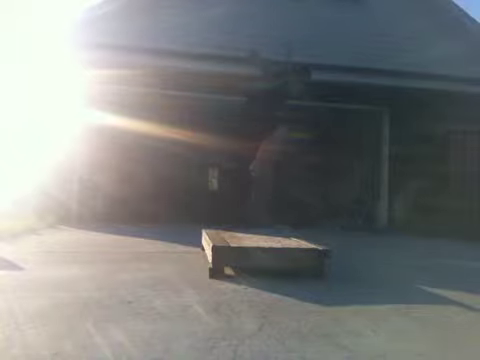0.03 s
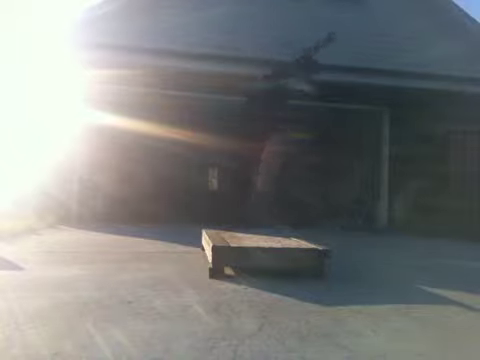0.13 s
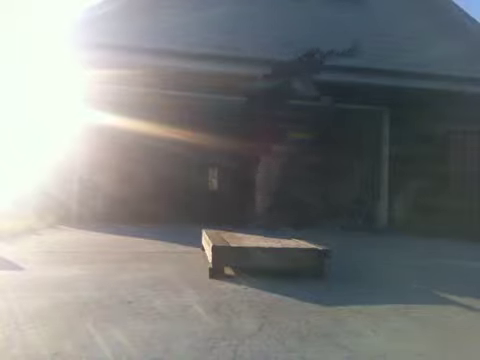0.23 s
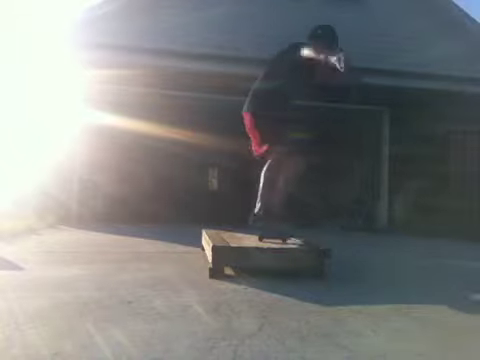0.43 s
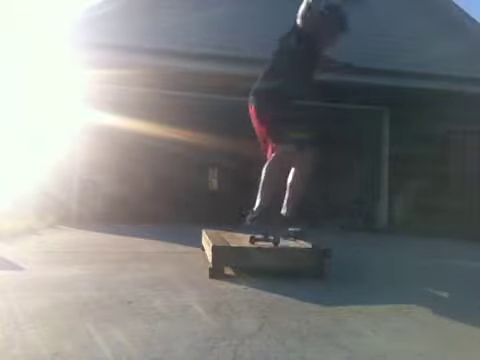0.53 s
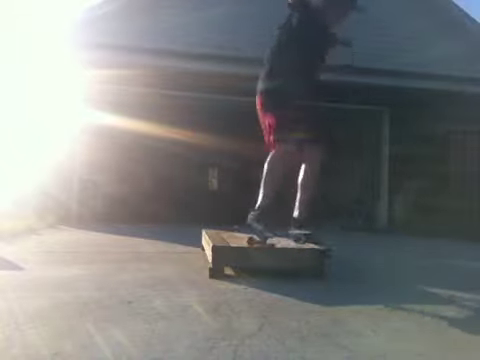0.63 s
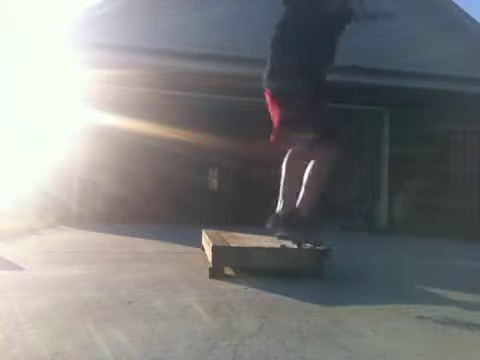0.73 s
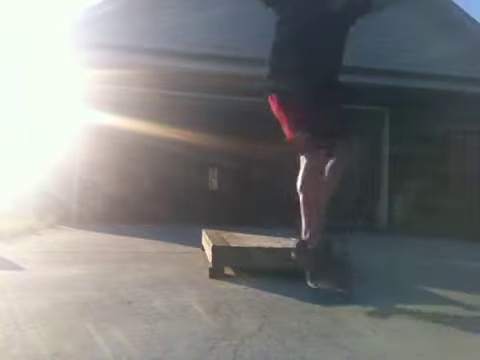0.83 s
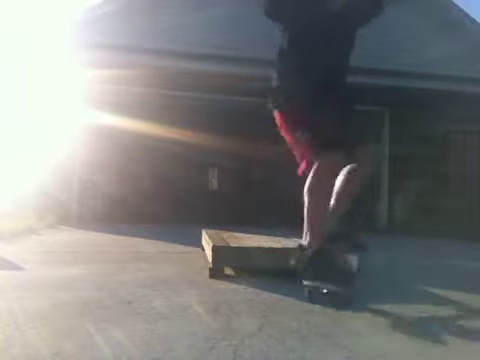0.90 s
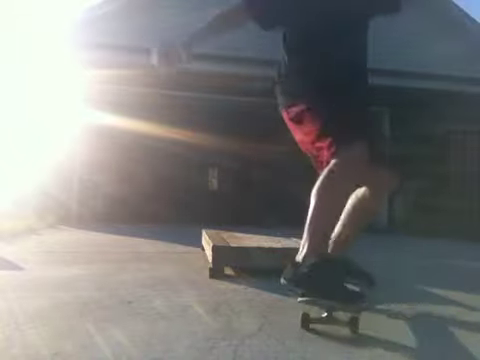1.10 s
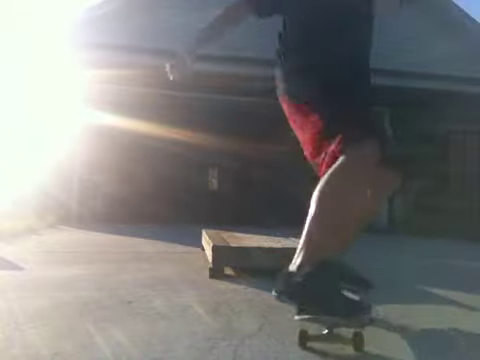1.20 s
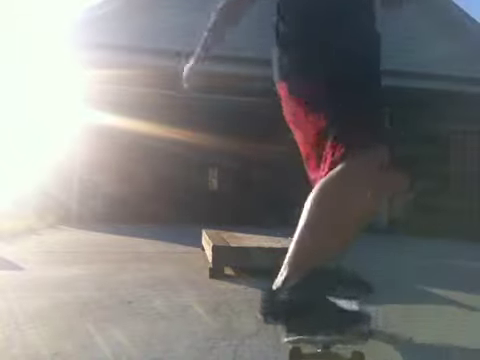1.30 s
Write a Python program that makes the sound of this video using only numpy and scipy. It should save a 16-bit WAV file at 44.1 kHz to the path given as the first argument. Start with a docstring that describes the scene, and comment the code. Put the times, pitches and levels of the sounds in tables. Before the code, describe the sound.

Skateboard knocks hard onto a low wooden box, rolls briefly, then clacks down onto concrete outdoors

```python
"""On concrete by a garage front, a skateboard pops, lands on a low wooden box, rolls over it, drops and rolls on.
Each contact pushes the deck: its low bending modes thud and its upper modes knock, all as dying sines.
The metal trucks clack with modes of their own, and grit crunches as bursts of shaped noise.
Rolling shakes the deck modes with noise. The garage front answers the contacts briefly;
a small camera thins the bass and adds its hiss."""
import sys
import numpy as np
from scipy import signal
from scipy.fft import rfft, irfft, next_fast_len
from scipy.io import wavfile
from scipy.ndimage import map_coordinates

SR = 44100
rng = np.random.default_rng(int(sys.argv[2]) if len(sys.argv) > 2 else 0)


def log_audio(samples):
    """Write samples as a 16-bit WAV file to the path given in sys.argv[1]."""
    # one column per channel
    frames = np.atleast_2d(samples).T
    # limit to full scale, then quantise
    limited = np.clip(frames, -1, 1)
    pcm = np.round(limited * 32767).astype(np.int16)
    wavfile.write(sys.argv[1], SR, pcm)


def volts_from_db(level):
    """Convert decibel levels to linear amplitude ratios."""
    exponent = np.asarray(level, float) / 20
    return 10 ** exponent


N = 59535  # length in samples, 1.35 s

# Bending modes of the deck. Each row: frequency in Hz, relative level in dB, decay time t60 in seconds.
DECK_MODES = [(100, 3.5, 0.084), (150, 14, 0.061), (177.3, 10.5, 0.12), (220, 3, 0.15), (269.7, 5, 0.076),
              (310, -1, 0.14), (387.6, -1.5, 0.073), (485.5, 1, 0.057), (560, -14, 0.042),
              (684.6, -7.5, 0.038), (741.6, -8, 0.054), (854, -10.5, 0.064), (962, -10, 0.045),
              (1076, -10, 0.027), (1193, -11, 0.068), (1513, -1.5, 0.033)]
# Contacts of tail and wheels. Each row: start in seconds, thud drive in dB, centre of the favoured thud modes
# in Hz, knock drive in dB, centre of the favoured knock modes in Hz.
DECK_BLOWS = [(.006, -56, 272, -45, 936), (.012, -51, 310, -43.5, 500), (0.029, -60, 282, -74, 636),
              (0.071, -51.5, 310, -70, 483), (.205, -66.5, 158, -62, 376), (0.242, -38, 237, -36.5, 746),
              (.248, -66, 190, -34.5, 800), (.253, -32.5, 205, -29, 515), (.265, -52, 246, -37.5, 500),
              (.285, -41, 150, -46.5, 730), (0.294, -39.5, 300, -58, 590), (.330, -47.5, 196, -49, 500),
              (.348, -58, 247, -39, 520), (.355, -53.5, 204, -43.5, 1150), (0.368, -38.5, 310, -45.5, 500),
              (.891, -35, 308, -36.5, 725), (.897, -36.5, 280, -36, 677), (0.913, -40.5, 241, -32.5, 640),
              (0.925, -32, 348, -54.5, 500), (.933, -40.5, 220, -55.5, 1306), (0.945, -46, 295, -48.5, 695),
              (0.956, -52, 220, -64, 500), (.976, -43.5, 225, -51, 500), (1.002, -61, 300, -34, 523),
              (1.011, -45.5, 306, -35, 966), (1.014, -29.5, 269, -27, 560), (1.027, -64, 290, -43, 500),
              (1.037, -42.5, 247, -73, 660), (1.056, -49, 167, -56, 520)]
# Ringing modes of the metal trucks. Each row: frequency in Hz, relative level in dB, decay time t60 in seconds.
TRUCK_MODES = [(1800, -10, 0.023), (2170, 0.5, 0.033), (2727, -2.5, 0.025), (3066, 2, 0.013),
               (3400, -4, 0.026), (4600, -4.5, 0.011)]
# Clacks of the trucks. Each row: start in seconds, drive in dB, centre of the favoured modes in Hz.
TRUCK_CLACKS = [(.006, -56.5, 2790), (.242, -56.5, 3200), (.249, -55.5, 2200), (.348, -47, 2820),
                (.349, -56, 4600), (.353, -76, 2100), (.895, -56.5, 2700), (.926, -56.5, 2970),
                (1.011, -57, 3270), (1.014, -46, 3400)]
# Grit crushed under wheels and tail. Each row: start in seconds, drive in dB, decay time t60 in seconds.
GRIT_SCUFFS = [(.006, -58, 0.072), (0.243, -47.5, 0.073), (0.251, -55, 0.19), (0.349, -50.5, 0.07),
               (0.844, -67, 0.36), (0.89, -54, 0.18), (0.926, -52.5, .12), (1.002, -47.5, 0.073),
               (1.01, -41.5, 0.034), (1.036, -72, 0.42)]
# Colour of the crushed grit. Each row: frequency in Hz, relative level in dB.
GRIT_COLOUR = [(600, -5), (1000, 5.5), (1500, 4.5), (2400, -8.5), (3400, -10.5), (5500, -27.5), (8000, -41)]
# Course of the rolling wheels. Each row: time in seconds, thud drive in dB, centre of the favoured thud modes
# in Hz, knock drive in dB.
ROLL_COURSE = [(0, -55.5, 271, -54), (0.099, -75, 220, -70), (.235, -83.5, 184, -79),
               (.3, -52.5, 191, -49.5), (.4, -58.5, 220, -52.5), (.47, -58, 203, -57.5),
               (.54, -55.5, 226, -59), (.62, -49, 240, -57), (.7, -57.5, 213, -57.5),
               (.77, -65.5, 217, -62.5), (.885, -59, 233, -64), (.95, -43, 240, -56), (1.0, -52, 220, -50),
               (1.08, -57.5, 220, -52), (1.12, -56.5, 220, -54), (1.14, -64.5, 199, -63),
               (1.16, -55, 180, -58.5), (1.199, -55, 175, -57), (1.29, -51, 183, -63),
               (1.35, -54.5, 190, -70)]
# Decay of the garage front's answer. Each row: frequency in Hz, decay time t60 in seconds.
GARAGE_DECAY = [(150, 0.26), (700, 0.15), (3000, 0.32)]
# Colour of the camera's hiss. Each row: frequency in Hz, relative level in dB.
HISS_COLOUR = [(24, 2), (60, -1.5), (150, 6.5), (600, 3.5), (900, 5.5), (1600, 1), (3000, -0.5), (4500, -3),
               (6500, -5.5), (8500, -10.5), (11000, -15.5), (15500, -19)]

RING_S = np.arange(SR // 4) / SR  # time within one ring or scuff, in seconds
MODE_SCATTER_DB = 1.5  # each contact hits another spot
THUD_OCTAVES, KNOCK_OCTAVES, CLACK_OCTAVES = 0.34, 0.35, 0.27  # spread of the favoured modes
THUD_RISE_S, KNOCK_RISE_S, CLACK_RISE_S, SCUFF_RISE_S = 0.0014, 0.0003, 0.00047, 0.0014
BUMP_DB, BUMPS_PER_S = 0.88, 51  # unevenness of the ground
ROLL_KNOCK_HZ, ROLL_KNOCK_OCTAVES, ROLL_LOW_HZ = 500, 0.36, 109
GARAGE_DB, GARAGE_DELAY_S = -13, 0.011
MIC_LOW_HZ, HISS_DB = 131.7, -70.5


def along(points, hz):
    """Reads a curve of (Hz, value) points on a log frequency axis."""
    point_hz, value = np.transpose(points)
    return np.interp(np.log(hz + 1), np.log(point_hz + 1), value)


def unit(x):
    """Scales a sound to rms 1."""
    return x / np.sqrt(np.mean(x ** 2) + 1e-20)


def filtered(x, response):
    """Multiplies the spectrum of x by a response of frequency."""
    size = next_fast_len(N + SR // 2)
    spectrum = rfft(x, size) * response(np.fft.rfftfreq(size, 1 / SR))
    return irfft(spectrum, size)[..., :N]


def coloured_noise(colour):
    """White noise shaped by a colour curve, at rms 1."""
    return unit(filtered(rng.standard_normal(N), lambda hz: volts_from_db(along(colour, hz))))


def favoured(centre_hz, octaves, modes):
    """A push favours modes near its centre: a bell-shaped weight over octaves."""
    mode_hz = [mode[0] for mode in modes]
    distance = np.log2(np.divide.outer(mode_hz, centre_hz))
    return np.exp(-0.5 * (distance / octaves) ** 2)


def ring(modes, gains, rise_s, pair_factor=1):
    """A struck body sums dying sines; each further pair of modes is multiplied by pair_factor once more."""
    total = np.zeros(len(RING_S))
    for k, ((hz, db, t60), gain) in enumerate(zip(modes, gains)):
        level = pair_factor ** ((k + 1) // 2) * gain  # a negative factor also flips every other pair
        total += level * volts_from_db(db - 60 * RING_S / t60) * np.sin(2 * np.pi * hz * RING_S)
    return (1 - np.exp(-RING_S / rise_s)) * total


def place(track, start_s, sound):
    """Adds a quarter-second sound to a track."""
    track[round(start_s * SR):][:len(sound)] += sound


def struck_spot(modes):
    """The spot that is hit excites each mode a little more or less."""
    return volts_from_db(MODE_SCATTER_DB * rng.standard_normal(len(modes)))


def deck_blows():
    """Each contact bends the deck: a softer-edged thud of the modes it favours, a sharper knock of others."""
    out = np.zeros(N + SR)
    for start_s, thud_db, thud_hz, knock_db, knock_hz in DECK_BLOWS:
        spot = struck_spot(DECK_MODES)
        thud_gains = spot * favoured(thud_hz, THUD_OCTAVES, DECK_MODES)
        knock_gains = spot * favoured(knock_hz, KNOCK_OCTAVES, DECK_MODES)
        thud = volts_from_db(thud_db) * ring(DECK_MODES, thud_gains, THUD_RISE_S)
        knock = volts_from_db(knock_db) * ring(DECK_MODES, knock_gains, KNOCK_RISE_S, -1.042)
        place(out, start_s, thud + knock)
    return out[:N]


def truck_clacks():
    """The metal trucks ring for a moment in their own high modes."""
    out = np.zeros(N + SR)
    for start_s, db, centre_hz in TRUCK_CLACKS:
        gains = struck_spot(TRUCK_MODES) * favoured(centre_hz, CLACK_OCTAVES, TRUCK_MODES)
        place(out, start_s, volts_from_db(db) * ring(TRUCK_MODES, gains, CLACK_RISE_S, -1.09))
    return out[:N]


def grit_scuffs():
    """Crushed grit is coloured noise under quick swells that die away."""
    swell = np.zeros(N + SR)
    for start_s, db, t60 in GRIT_SCUFFS:
        place(swell, start_s, volts_from_db(db - 60 * RING_S / t60) * (1 - np.exp(-RING_S / SCUFF_RISE_S)))
    return swell[:N] * coloured_noise(GRIT_COLOUR)


def rolling():
    """Rolling shakes the deck modes with noise; the surface, box or concrete, shifts which ones thud."""
    point_s, *columns = np.transpose(ROLL_COURSE)
    t = np.arange(N) / SR
    thud_db, thud_hz, knock_db = (np.interp(t, point_s, column) for column in columns)
    bumps = volts_from_db(BUMP_DB * map_coordinates(rng.standard_normal(200), [t * BUMPS_PER_S]))
    thud_share = favoured(thud_hz, THUD_OCTAVES, DECK_MODES)
    thud_share = thud_share / np.linalg.norm(thud_share, axis=0)
    knock_share = favoured([ROLL_KNOCK_HZ], ROLL_KNOCK_OCTAVES, DECK_MODES)
    knock_share = knock_share / np.linalg.norm(knock_share)
    drive = volts_from_db(thud_db) * thud_share + volts_from_db(knock_db) * knock_share  # one row per mode
    shaken = np.zeros(N)
    for (hz, db, t60), mode_drive in zip(DECK_MODES, drive):
        mode_ring = ring([(hz, 0, t60)], [1], KNOCK_RISE_S)
        mode_noise = signal.fftconvolve(rng.standard_normal(N), mode_ring)[:N]
        shaken += mode_drive * volts_from_db(db) * unit(mode_noise)
    return filtered(bumps * shaken, lambda hz: (1j * hz / (ROLL_LOW_HZ + 1j * hz)) ** 2)


def garage(x):
    """The wall answers after a short delay with a noise tail; each frequency dies at its own speed."""
    hz, t, noise = signal.stft(rng.standard_normal(SR // 2), SR, nperseg=256)
    decay = volts_from_db(-60 * t / along(GARAGE_DECAY, hz)[:, None])
    tail = signal.istft(noise * decay, SR, nperseg=256)[1]
    delayed = np.pad(x, (round(GARAGE_DELAY_S * SR), 0))
    return signal.fftconvolve(delayed, tail / np.linalg.norm(tail))[:N]


def camera_hiss():
    """The camera's own noise is a steady coloured hiss."""
    return volts_from_db(HISS_DB) * coloured_noise(HISS_COLOUR)


def scene():
    """Contacts with their answer from the garage front, and the dry rolling."""
    contacts = deck_blows() + truck_clacks() + grit_scuffs()
    return (contacts + volts_from_db(GARAGE_DB) * garage(contacts) + rolling())[None]


def top_cut(x):
    """Nothing passes above the cut-off."""
    return signal.sosfilt(signal.butter(12, 15610, fs=SR, output="sos"), x)


def record(dry):
    """A small camera microphone thins the bass with three equal low cuts and adds hiss."""
    thin = filtered(dry, lambda hz: (1j * hz / (MIC_LOW_HZ + 1j * hz)) ** 3)
    return top_cut(thin + camera_hiss())


dry = scene()
out = record(dry)
log_audio(out)
```